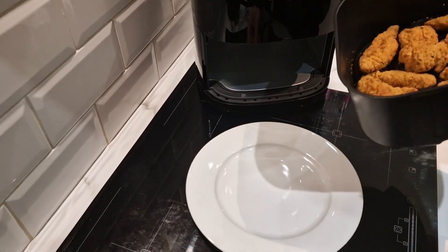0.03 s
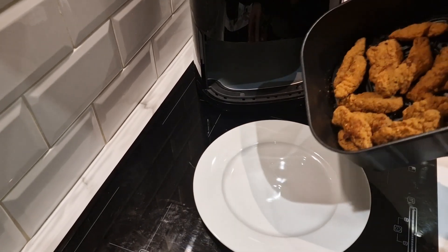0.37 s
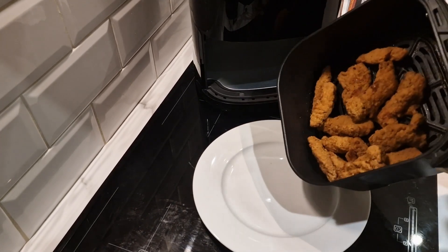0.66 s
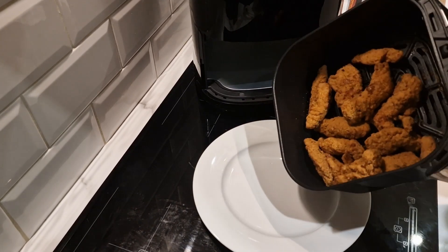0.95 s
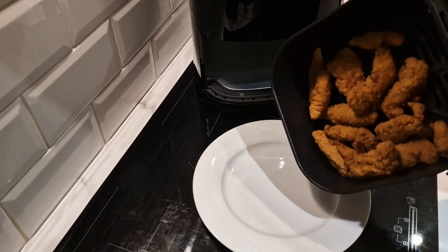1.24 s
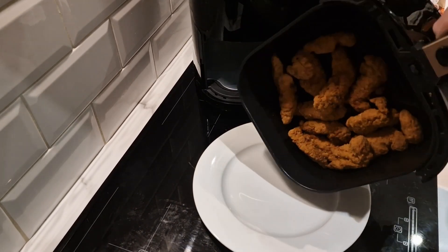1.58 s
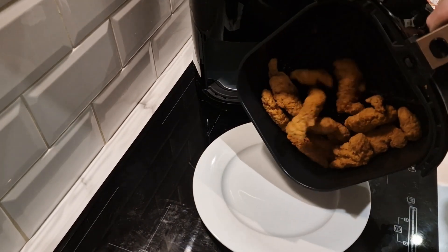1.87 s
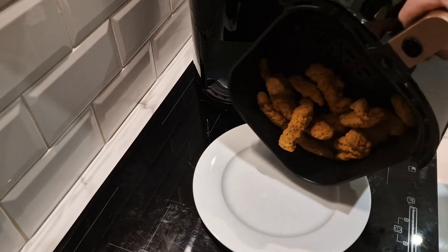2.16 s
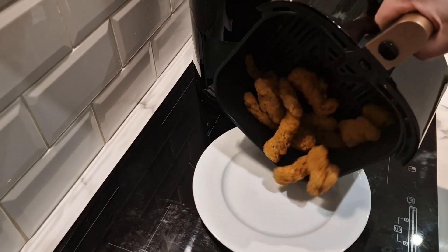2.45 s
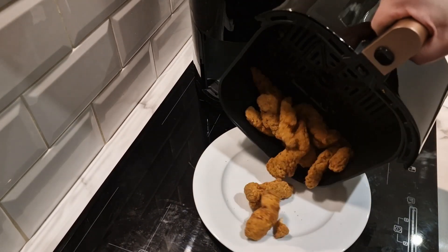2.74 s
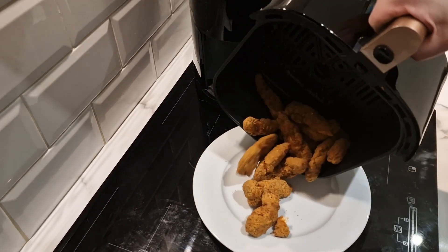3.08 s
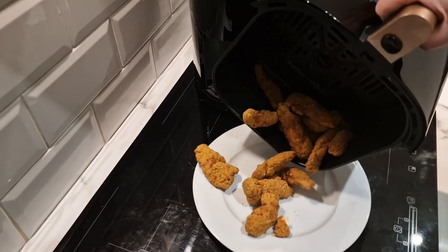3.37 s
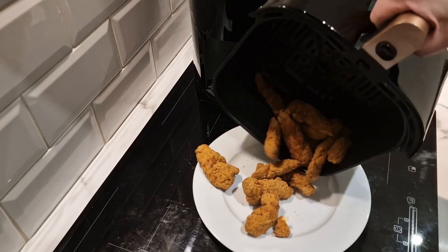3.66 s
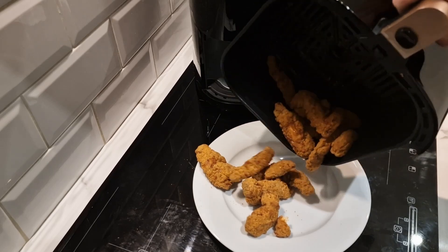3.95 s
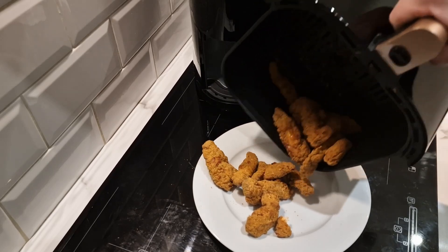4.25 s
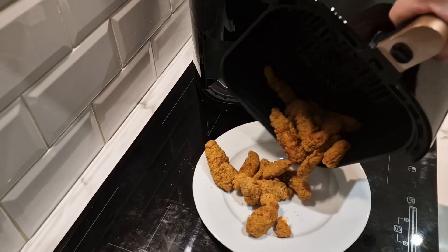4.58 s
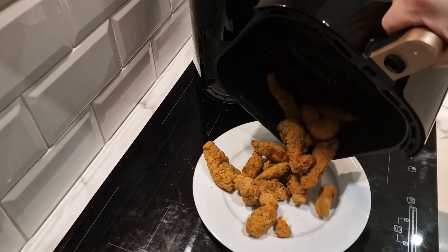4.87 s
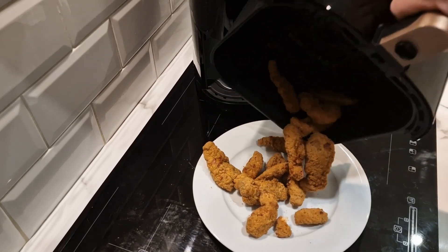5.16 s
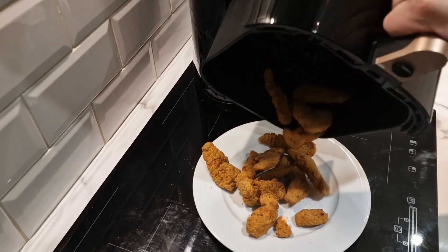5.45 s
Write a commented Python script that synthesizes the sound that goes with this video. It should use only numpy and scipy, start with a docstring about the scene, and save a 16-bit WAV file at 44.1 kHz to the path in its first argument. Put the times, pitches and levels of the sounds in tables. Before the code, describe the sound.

Close stereo microphones by a kitchen worktop catch a faint crumbly rustle and a couple of dull knocks from a fryer basket. Breaded strips then scrape along its floor in surges and drop onto a plate, with low thumps that boom in the worktop, small snaps of crust and occasional short ceramic clinks. More sliding and bumping follows as the rest tumble out, with a brief room echo.

```python
"""Breaded strips tipped onto a plate

A small kitchen, a stereo pair close to the worktop. Crisp strips slide from a non-stick fryer basket
onto a ceramic plate. The basket knocks and rattles, crumbs rasp along its floor as it tilts, and the
strips drop with soft thuds that boom in the worktop and now and then make the plate clink."""
import sys
import numpy as np
from scipy import signal
from scipy.fft import rfft, irfft, next_fast_len
from scipy.io import wavfile
from scipy.ndimage import uniform_filter1d

SR = 44100
rng = np.random.default_rng(int(sys.argv[2]) if len(sys.argv) > 2 else 0)


def waveform_to_disk(signal):
    """Save audio, clipped to [-1, 1], as 16-bit WAV at the path in sys.argv[1]."""
    frames = np.transpose(np.atleast_2d(signal))
    scaled = np.clip(frames, -1, 1) * 32767
    samples = np.round(scaled).astype(np.int16)
    wavfile.write(sys.argv[1], SR, samples)


N = 252252
RING_S = np.arange(int(.8 * SR)) / SR  # time axis of one blow


# Dull blows of strips and basket: start_s, worktop_db, walls_db
THUD_HITS = [(0.704, -20.5, -25.5), (0.722, -32, -53), (0.744, -35, -59),
             (0.801, -45, -58),(1.505, -23, -28), (1.942, -39.5, -51), (2.42, -59, -30.5),
             (2.537, -30.5, -39.5), (2.596, -24.5, -38), (2.64, -35, -25.5), (2.696, -27, -36),
             (2.792, -32, -35), (2.836, -30, -35.5), (2.98, -32, -47), (3.137, -21, -48), (3.19, -27, -49),
             (3.262, -20, -31.5), (3.344, -29, -40.5), (3.534, -35, -48.5), (3.72, -20.5, -26),
             (3.772, -31.5, -32.5), (3.915, -34.5, -46), (4.06, -26, -28), (4.091, -26, -56),
             (4.12, -45, -37), (4.199, -38, -34.5), (4.437, -48, -24.5), (4.482, -29, -30.5),
             (4.779, -28, -34), (4.835, -28.5, -34.5), (4.924, -34.5, -51), (5.11, -27, -32.5),
             (5.179, -32.5, -54), (5.216, -31.5, -44), (5.466, -27.5, -40), (5.674, -26, -80)]
# Modes of the worktop and of the basket's thin walls: pitch_hz, level_db, t60_s
WORKTOP_MODES = [(47.5, -8, 0.44), (91.9, 7, 0.13), (112, -4, 0.25), (126.6, 6, 0.23), (141.5, -1.5, 0.23)]
WALL_MODES = [(196.4, -2.5, 0.18), (244.5, -6, 0.2), (290.6, 6, 0.093), (324.4, 2, 0.12), (345, 7, 0.082),
              (393, -5, 0.14)]
# Spectrum of the walls' densely packed modes: frequency_hz, gain_db
WALL_SPECTRUM = [(100, -10), (180, -7), (300, -11), (400, -7), (520, -36), (1000, -38), (3000, -62)]

def thuds(worktop_trim_db=-3, walls_trim_db=-1, push_s=0.0021):
    """A soft push booms in the worktop and in the thin walls of the basket."""
    out = np.zeros((2, N))
    push = 1 - np.exp(-RING_S / push_s)
    for start_s, worktop_db, walls_db in THUD_HITS:
        boom = unit_attack(push * ring(WORKTOP_MODES, scatter_db=1.2, phase_spread=.25))
        walls = unit_attack(push * ring(WALL_MODES, scatter_db=1.5))
        walls += amp(-3) * unit_attack(shaped(burst(t60_s=0.19), WALL_SPECTRUM))
        add(out, start_s, amp(worktop_db + worktop_trim_db) * boom)
        add(out, start_s, amp(walls_db + walls_trim_db) * unit_attack(walls))
    return kitchen(out, wet_db=-16)


# Hard knocks on the basket: start_s, level_db, cutoff_hz, favoured_hz
KNOCK_HITS = [(0.4645, -51.5, 2440, 905), (0.7023, -23.5, 3100, 1500), (0.7072, -20.5, 2500, 700),
              (0.737, -34, 1108, 750), (1.5034, -34, 2050, 1660), (1.507, -35.5, 1880, 1710),
              (1.533, -37.5, 2080, 1460), (1.943, -42, 4100, 666), (2.420, -25.5, 2000, 610),
              (2.434, -31.5, 1190, 526), (2.465, -41, 1910, 724), (2.5645, -37.5, 3200, 2000),
              (2.641, -34, 2580, 634), (2.690, -32, 3230, 650), (2.806, -37.5, 1900, 1300),
              (3.077, -49.5, 2720, 1800), (3.183, -45.5, 3480, 1690), (3.260, -30, 3720, 2060),
              (3.265, -33, 3200, 1410), (3.341, -38, 2520, 1630), (4.061, -43, 2480, 970),
              (4.087, -42.5, 3580, 2040), (4.436, -39.5, 2030, 1220), (4.478, -38.5, 1700, 1180),
              (4.836, -40.5, 2880, 2300), (5.177, -48.5, 3500, 1500), (5.217, -38, 3480, 2140),
              (5.246, -46.5, 2880, 1760), (5.686, -45, 3550, 2300)]
# Modes of its stiff body: pitch_hz, level_db, t60_s
BASKET_MODES = [(455, -4, .15), (497, -2, .19), (587, -1, .2), (689, -3, .16), (722, -1, .15),
                (785, -3, .15), (832, 2, .2), (912, -4, .15), (1068, -6, .15), (1114, -4, .13),
                (1346, -4, .16), (1474, -3, .16), (1545, -3, .17), (1740, -2, .19), (1846, -3, .15),
                (1976, -7, .13), (2085, -3, .19), (2304, -6, .14), (2546, -10, .15), (2935, 6, .095),
                (3316, -10, .15)]
# Spectra of its short clatter and of the rack inside: frequency_hz, gain_db
CLATTER_SPECTRUM = [(200, -56.5), (380, 6), (750, 4), (1100, 0.5), (1700, 2), (2300, 1), (4000, -0.5),
                    (8000, -2), (16000, -9.5)]
RACK_SPECTRUM = [(450, -38), (780, 18), (1100, -20), (1700, -12), (2200, 27.5), (2800, -38), (4400, -10),
                 (7000, -35)]

def knocks(trim_db=-1, favoured_db=6):
    """The basket cracks, clatters and rings, dulled by the contact's softness; its rack rings faintly."""
    out = np.zeros((2, N))
    for start_s, level_db, cutoff_hz, favoured_hz in KNOCK_HITS:
        def contact_db(hz):
            dulling_db = 10 * np.log10(1 / (1 + (hz / cutoff_hz) ** 6) + amp(-48.5))
            return dulling_db + favoured_db * amp(peak_db(hz, favoured_hz, width_oct=0.45))
        rattle = burst(t60_s=0.15)
        crack = amp(2) * burst(t60_s=0.045)
        clatter = unit_attack(shaped(rattle + crack, CLATTER_SPECTRUM))
        rack = amp(-40) * unit_attack(shaped(burst(t60_s=1.37), RACK_SPECTRUM))
        body = amp(-7) * unit_attack(ring(BASKET_MODES, scatter_db=2.4))
        blow = colour(clatter + body + rack, contact_db)
        add(out, start_s, amp(level_db + trim_db) * unit_attack(blow))
    return kitchen(out, wet_db=-16)


# Separate slips of the strips: peak_s, level_db, rise_s, fall_s, weight_db
STRIP_SLIPS = [(0.01, -66.5, 0.14, 0.21, 6.5), (0.16, -71.5, 0.13, 0.11, 6.5), (0.473, -54, 0.066, 0.18, 0),
               (0.55, -56, 0.077, 0.079, 5.5), (0.632, -52, 0.09, 0.12, 8), (0.73, -53, 0.044, 0.25, 4),
               (0.97, -59, 0.45, 0.3, -6), (1.40, -70, .08, 0.11, -2), (1.633, -48, 0.14, 0.19, 4.5),
               (1.78, -54.5, 0.29, 0.53, 4), (1.95, -50, 0.1, 0.083, 4), (2.109, -58, .05, 0.054, -5),
               (2.36, -50, .15, .12, 0), (2.44, -41, 0.076, 0.21, 2), (2.515, -43.5, 0.093, 0.042, -5),
               (2.604, -43.5, 0.12, 0.067, 7), (2.67, -44.5, 0.05, 0.18, 7.5), (2.88, -43, 0.15, 0.1, 2.5),
               (3.19, -59.5, 0.12, 0.12, 11), (3.28, -68.5, 0.11, 0.48, 15), (3.62, -57, 0.11, 0.16, 8.5),
               (3.712, -42, 0.047, 0.091, 0), (3.79, -55.5, 0.1, 0.48, 0), (3.94, -54, 0.37, 0.21, 5.5),
               (4.09, -52.5, 0.13, 0.27, 8), (4.331, -54.5, 0.32, .1, 4.5), (4.46, -53.5, 0.057, 0.065, 12),
               (4.68, -45, 0.32, 0.28, 4), (4.835, -50.5, 0.093, 0.097, 7), (5.11, -55.5, 0.076, 0.11, 8),
               (5.437, -47, 0.093, .2, 4), (5.618, -38.5, 0.13, .12, -0.5)]
# Loose crumbs creep between slips, more as the basket tips: time_s, level_db
CRUMB_CREEP = [(0, -81), (.33, -80.5), (1.298, -73), (2.2, -74), (2.5, -52), (3.1, -58), (3.498, -66.5),
               (3.902, -72), (4.9, -57), (5.3, -60.5), (5.72, -50.5)]

def motion(creep_weight_db=-2.5):
    """Strength of the sliding, plain and weighted by the load on the basket floor."""
    power = amp(np.interp(np.arange(N) / SR, *np.transpose(CRUMB_CREEP))) ** 2
    pressed_power = amp(creep_weight_db) ** 2 * power
    for peak_s, level_db, rise_s, fall_s, weight_db in STRIP_SLIPS:
        slip = swell(peak_s, level_db, rise_s, fall_s)
        power += slip
        pressed_power += amp(weight_db) ** 2 * slip
    return np.sqrt(power), np.sqrt(pressed_power)


# Spectra of the bright rasp and the hollow scrape: frequency_hz, gain_db
RASP_SPECTRUM = [(500, -37), (1500, 5), (2800, 2.5), (4500, 7), (6000, 5), (8500, 4), (11000, -2.5),
                 (13500, 2.5), (16000, -3.5)]
HOLLOW_SPECTRUM = [(200, -36.5), (400, 11), (540, -3.5), (760, 3.5), (1050, 1.5), (1320, 3.5), (1550, 0),
                   (1750, 1), (2300, -3.5), (3200, -6.5), (6000, -19), (16000, -61)]

def sliding(rasp_db=-0.5, hollow_db=-1, crackle_db=-8):
    """Crumbs rasp and crackle on the coating, the basket colours their scrape, and the strips tumble."""
    speed, pressed = motion()
    crumbs = unit_rms(grains(per_s=3400, spread_db=1, t60_s=.003))
    crumbs += amp(crackle_db) * unit_rms(grains(per_s=150, spread_db=3.5, t60_s=0.013))
    crumbs = basket_floor(crumbs, ring_db=-1, t60_s=.05)
    scrape = grains(per_s=700, spread_db=1.5, t60_s=0.021)
    scrape = basket_floor(scrape, ring_db=0.5, t60_s=0.067)
    friction = amp(rasp_db) * speed * unit_rms(shaped(crumbs, RASP_SPECTRUM))
    friction += amp(hollow_db) * pressed * unit_rms(shaped(scrape, HOLLOW_SPECTRUM))
    friction *= lurches()
    return kitchen(friction + tumbling(pressed), wet_db=-10)


def grains(per_s, spread_db, t60_s, trains=12):
    """Crumbs catch and slip: trains of uneven clicks, each train with its own tiny ring."""
    out = np.zeros((2, N))
    for _ in range(trains):
        catches = rng.random(N) < per_s / trains / SR
        clicks = catches * amp(spread_db * np.minimum(rng.exponential(1, N), 4))
        out += signal.oaconvolve(clicks[None], burst(t60_s)[:, :512], axes=1)[:, :N]
    return out


def basket_floor(x, ring_db, t60_s, size=6144):
    """Crumbs ring the basket floor; its crowd of modes changes as the load shifts."""
    out = np.zeros((2, N))
    window = signal.windows.hann(size, sym=False)
    for start in range(0, N, size // 2):
        part = x[:, start:start + size] * window[:N - start]
        response = burst(t60_s)[:, :size // 2]
        response /= np.linalg.norm(response[0])
        add(out, start / SR, signal.fftconvolve(part, response, axes=1))
    return x + amp(ring_db) * out


def lurches(depth_db=1.3, size=640):
    """The strips catch and let go, so the friction comes in short, uneven surges."""
    wander = uniform_filter1d(rng.standard_normal(N), size)
    wander = unit_rms(uniform_filter1d(wander, size // 2))
    return unit_rms(amp(depth_db * np.clip(wander, -2, 2)))


# Low rumble of strips rolling over each other: frequency_hz, gain_db
TUMBLE_SPECTRUM = [(25, -17), (48, 10), (68, -1.5), (95, 6.5), (130, 9.5), (190, -10.5), (290, 6.5),
                   (400, -8.5), (550, -11), (1500, -50.5)]

def tumbling(pressed, pivot_db=-50, growth=0.84):
    """Strips roll; the hand-held basket passes little deep bass, the worktop all of it."""
    in_basket, on_worktop = unit_rms(shaped(rng.standard_normal((2, 2, N)), TUMBLE_SPECTRUM))
    rolling = amp(pivot_db) * (pressed / amp(pivot_db)) ** growth  # faster strips skid rather than roll
    return rolling * low_cut(in_basket, hz=60) + settling() * on_worktop


def settling(trim_db=-16, t60_s=0.6):
    """Strength of the jostling that each thud leaves in the heap."""
    power = np.zeros((1, N))
    for start_s, worktop_db, _ in THUD_HITS:
        add(power, start_s, (amp(worktop_db + trim_db) * decay(t60_s)[None]) ** 2)
    return np.sqrt(power[0])


# Blows on the plate, a row per group of modes woken: start_s, level_db, favoured_hz, width_oct
CLINK_HITS = [(3.1385, -40, 5700, 0.054), (3.1375, -39, 1690, 0.069), (3.1373, -40.5, 4000, 0.14),
              (3.1375, -47, 2500, .1), (3.264, -33, 2110, 0.44), (3.261, -49.5, 6740, .06),
              (3.261, -56, 8480, 0.056), (3.34, -56, 4240, 0.077), (3.433, -65, 4330, 0.048),
              (3.482, -63, 4260, 0.087), (3.482, -66, 7900, 0.11), (3.48, -56.5, 1780, 0.091),
              (5.109, -43.5, 2470, 0.1), (5.111, -46.5, 7600, 1)]
# Modes of the ceramic: pitch_hz, level_db, t60_s
PLATE_MODES = [(1310, -3, .18), (1545, -4, .2), (1680, -9, .2), (1768, 0, .21), (2087, 3, .16),
               (2510, -4, .11), (2724, -4, .16), (2945, -5, .3), (3903, -1, .13), (4301, -13, .36),
               (5512, -12, .12), (5796, 3, .13), (5990, -8, .14), (7160, -4, .24), (7800, -2, .22),
               (8482, -6, .22), (10490, -7, .12), (12630, -12, .22)]

def clinks():
    """The plate rings most in the modes that move where it is struck; the food soon damps it."""
    out = np.zeros((2, N))
    for start_s, level_db, favoured_hz, width_oct in CLINK_HITS:
        modes = [(hz, db + peak_db(hz, favoured_hz, width_oct), t60_s) for hz, db, t60_s in PLATE_MODES]
        tick = colour(burst(t60_s=0.014), lambda hz: peak_db(hz, favoured_hz, width_oct))
        damping = 1 + .8 * decay(t60_s=.07)
        clink = unit_attack(damping * ring(modes, scatter_db=1)) + amp(-7) * unit_attack(tick)
        add(out, start_s, amp(level_db) * unit_attack(clink))
    return kitchen(out, wet_db=-28.5)


# Breaks in the crust: start_s, level_db, brightest_hz
CRUST_SNAPS = [(0.465, -50.5, 3020), (0.605, -50, 6900), (0.625, -51, 7000), (0.958, -50, 8100),
               (1.068, -56, 10900), (1.347, -55.5, 8970), (1.390, -59.5, 1400), (1.941, -48, 6770),
               (2.419, -36.5, 6800), (2.538, -46, 7000), (2.565, -47, 5000), (2.597, -48, 7000),
               (2.639, -31.5, 5200), (2.689, -52, 4000), (2.813, -42.5, 4000), (3.107, -57, 5060),
               (3.14, -50, 8000), (3.184, -45.5, 9000), (3.257, -45.5, 4900), (3.695, -50, 7000),
               (4.06, -53, 6930), (4.438, -43.5, 4240), (4.926, -42.5, 3800), (5.111, -44.5, 5800),
               (5.177, -52.5, 4000)]

def snaps(trim_db=-4, slope_db_per_oct=6):
    """Crust breaks with one sharp crack and a quickly fading spray of tiny ones."""
    out = np.zeros((2, N))
    for start_s, level_db, brightest_hz in CRUST_SNAPS:
        grit_db = 3 * np.repeat(rng.standard_normal(len(RING_S)), 24)[:len(RING_S)]
        spray = amp(grit_db) * burst(t60_s=0.1)
        crack = amp(4) * burst(t60_s=0.0031)
        snap = colour(spray + crack, lambda hz: -slope_db_per_oct * abs(np.log2((hz + 1) / brightest_hz)))
        add(out, start_s, amp(level_db + trim_db) * unit_attack(snap))
    return kitchen(out, wet_db=-14.5)


# Tiny squeaks of crust on the coating: start_s, level_db, pitch_hz, t60_s
CRUST_SQUEAKS = [(0.194, -68.5, 3960, 0.048), (0.439, -56.5, 4930, 0.05), (0.625, -49, 4300, 0.042),
                 (1.834, -51.5, 6020, 0.16), (2.517, -48, 4800, 0.17), (4.059, -52.5, 5100, 0.014),
                 (5.009, -58, 6600, 0.27)]

def squeaks(trim_db=-1):
    """Stick and slip draws a brief, rough, half-pitched chirp from the coating."""
    out = np.zeros((2, N))
    for start_s, level_db, pitch_hz, t60_s in CRUST_SQUEAKS:
        squeak = colour(burst(t60_s), lambda hz: peak_db(hz, pitch_hz, width_oct=0.094))
        add(out, start_s, amp(level_db + trim_db) * unit_attack(squeak))
    return kitchen(out, wet_db=-17)


# The basket rubs and sings faintly: peak_s, level_db, rise_s, fall_s
BASKET_RUBS = [(0.0, -68, .1, 0.49), (0.96, -67, 0.13, 0.35), (2.05, -77.5, .1, 0.072),
               (2.4, -48.5, 0.068, 0.057)]

def rubs(pitch_hz=1800, width_hz=110):
    """Fine friction keeps one resonance of the basket sounding."""
    friction = rng.standard_normal((2, N))
    singing = colour(friction, lambda hz: -15 * np.log10(1 + ((hz - pitch_hz) / width_hz) ** 2))
    return np.sqrt(sum(swell(*row) for row in BASKET_RUBS)) * unit_rms(singing)


# Reverberation of the small kitchen: frequency_hz, t60_s
KITCHEN_DECAY = [(100, 0.66), (400, 0.4), (1500, 0.32), (5000, 0.11), (15000, 0.21)]

def kitchen(x, wet_db):
    """Tiles and cupboards answer with a short tail, each band dying at its own speed."""
    hz, t, bands = signal.stft(rng.standard_normal((2, len(RING_S))), SR, nperseg=256)
    bands = bands * amp(-60 * t / curve_at(KITCHEN_DECAY, hz)[:, None])
    _, tail = signal.istft(bands, SR, nperseg=256)
    tail[:, :180] = 0  # reflections reach the microphones 4 ms after the direct sound
    tail /= np.linalg.norm(tail[0])
    return x + amp(wet_db) * signal.fftconvolve(x, tail, axes=1)[:, :N]


# Spectrum of the room behind the action: frequency_hz, gain_db
HUSH_SPECTRUM = [(20, -12), (50, 4), (80, 4), (130, 9), (200, -18), (290, 3), (500, -33), (1000, -63),
                 (2000, -26), (4000, -14), (9000, -13.5), (16000, -20)]

def room_tone(level_db=-70):
    """The low, steady hush of the kitchen."""
    return amp(level_db) * unit_rms(shaped(rng.standard_normal((2, N)), HUSH_SPECTRUM))


def ring(modes, scatter_db, phase_spread=1):
    """Modes as mid and side; each point of contact weights them differently."""
    out = np.zeros((2, len(RING_S)))
    for hz, db, t60_s in modes:
        weight = amp(db + scatter_db * rng.standard_normal())
        phase = phase_spread * rng.uniform(-np.pi, np.pi, (2, 1))
        out += weight * decay(t60_s) * np.sin(2 * np.pi * hz * RING_S + phase)
    return out


def burst(t60_s):
    """A crowd of modes too dense to tell apart, as mid and side."""
    return rng.standard_normal((2, len(RING_S))) * decay(t60_s)


def decay(t60_s):
    """Falls by 60 dB in t60_s, or in 5 ms if that is longer."""
    return amp(-60 * RING_S / max(t60_s, .005))


def swell(peak_s, level_db, rise_s, fall_s, depth_db=27, roundness=1.35):
    """Power of a move that gathers speed and brakes, depth_db down at rise_s before and fall_s after."""
    t = np.arange(N) / SR - peak_s
    away = np.where(t < 0, -t / rise_s, t / fall_s)
    return np.where(away < 4, amp(level_db - depth_db * away ** roundness) ** 2, 0)


def peak_db(hz, favoured_hz, width_oct):
    """Gain that falls away on both sides of the frequency best excited."""
    return -20 * np.log10(1 + (np.log2((hz + 1) / favoured_hz) / width_oct) ** 2)


def colour(x, curve_db):
    """Minimum-phase filter whose gain in dB is a function of frequency."""
    size = next_fast_len(x.shape[-1] + 4096)
    hz = abs(np.fft.fftfreq(size, 1 / SR))
    log_gain = np.log(amp(np.maximum(curve_db(hz), -100)))
    response = np.exp(np.conj(signal.hilbert(log_gain)))[:size // 2 + 1]
    return irfft(rfft(x, size) * response, size)[..., :x.shape[-1]]


def shaped(x, spectrum):
    return colour(x, lambda hz: curve_at(spectrum, hz))


def curve_at(points, hz):
    points_hz, values = np.transpose(points)
    return np.interp(np.log(hz + 1), np.log(points_hz + 1), values)


def low_cut(x, hz):
    return signal.sosfilt(signal.butter(2, hz, "highpass", fs=SR, output="sos"), x)


def amp(db):
    return 10 ** (np.asarray(db) / 20)


def unit_rms(x):
    return x / np.sqrt(np.mean(x ** 2) + 1e-20)


def unit_attack(x):
    """Scales a blow to unit power over its first 15 ms."""
    return x / np.sqrt(np.mean(x[:, :int(.015 * SR)] ** 2) + 1e-20)


def add(mix, start_s, sound):
    part = mix[:, round(start_s * SR):][:, :sound.shape[1]]
    part += sound[:, :part.shape[1]]


# Stereo width at the microphones: frequency_hz, side_over_mid_db
STEREO_WIDTH = [(60, -25), (125, -21.5), (250, -15.5), (500, -3), (1000, -1), (2000, -2), (4000, 0)]

def scene():
    """Bass reaches both microphones alike; treble arrives unrelated."""
    mid, side = knocks() + thuds() + clinks() + snaps() + squeaks() + sliding() + rubs() + room_tone()
    side = shaped(side, STEREO_WIDTH)
    return np.array([amp(-0.02) * (mid + side), amp(-0.14) * (mid - side)])


def record(dry, low_cut_hz=36, high_cut_hz=16050):
    """The recorder's bass roll-off and band limit."""
    band_limit = signal.firwin(511, high_cut_hz, window=("kaiser", 9), fs=SR)
    return signal.oaconvolve(low_cut(dry, low_cut_hz), band_limit[None], "same")


dry = scene()
out = record(dry)
waveform_to_disk(out)
```